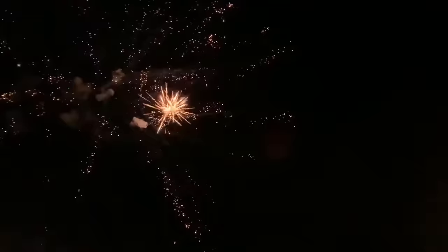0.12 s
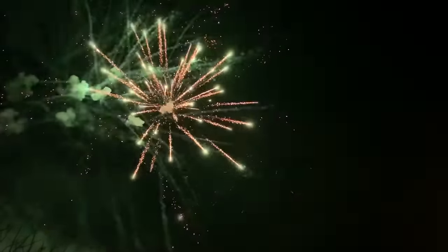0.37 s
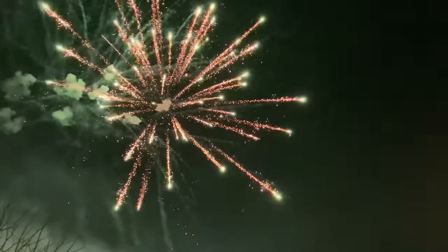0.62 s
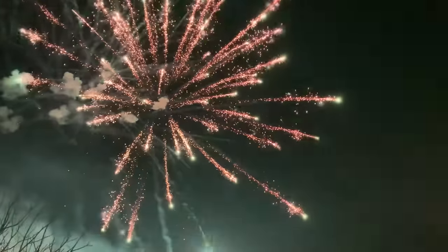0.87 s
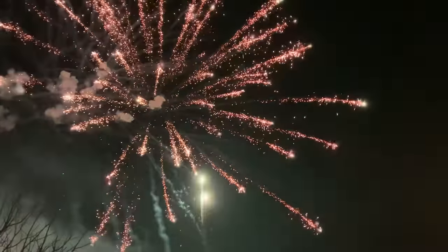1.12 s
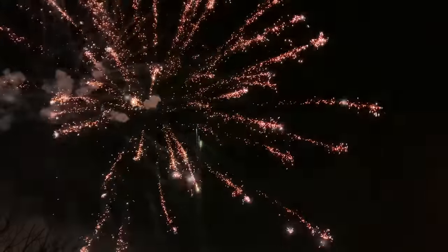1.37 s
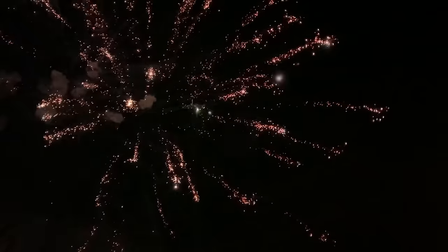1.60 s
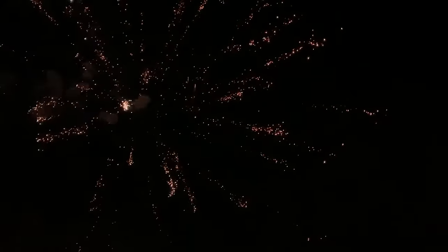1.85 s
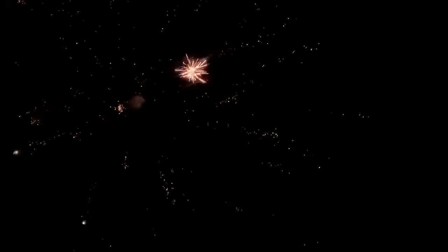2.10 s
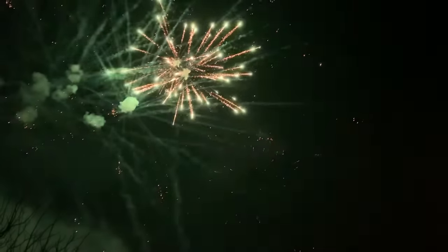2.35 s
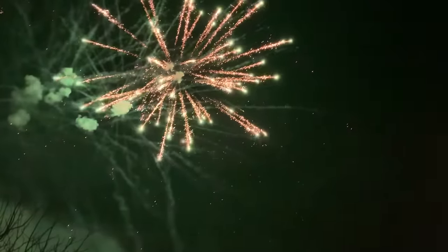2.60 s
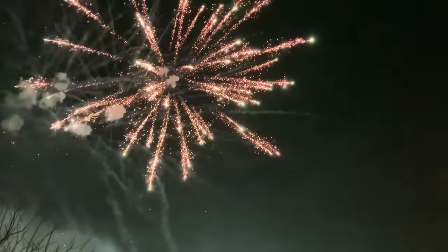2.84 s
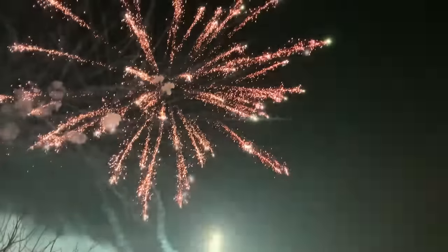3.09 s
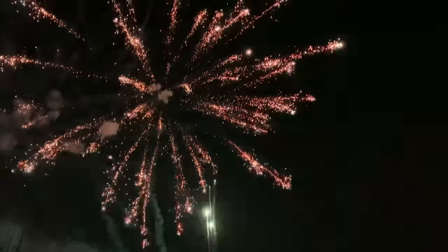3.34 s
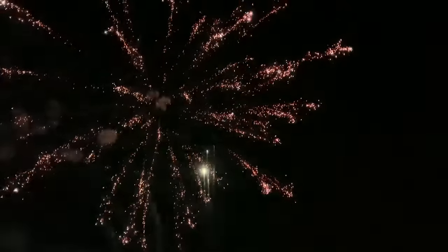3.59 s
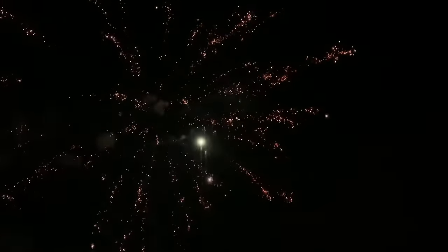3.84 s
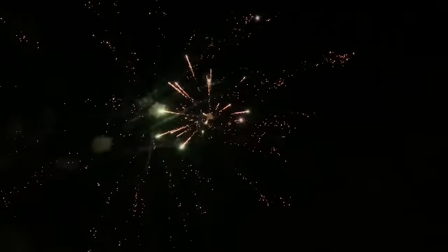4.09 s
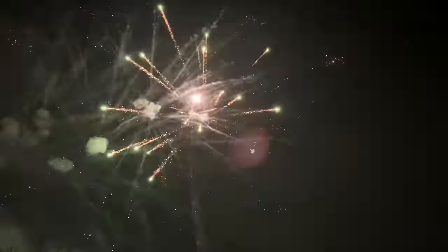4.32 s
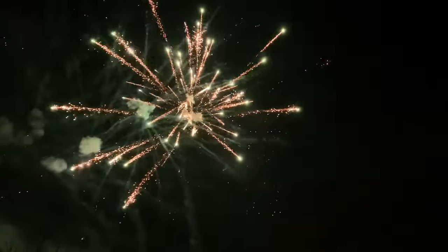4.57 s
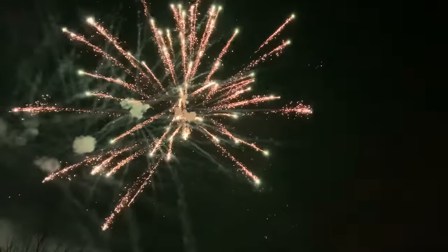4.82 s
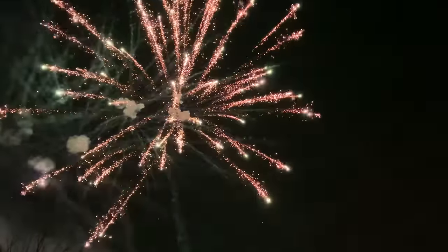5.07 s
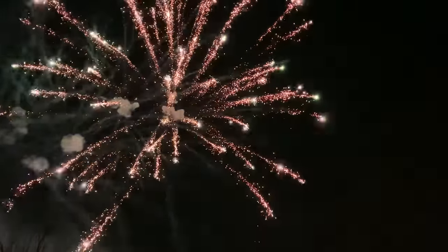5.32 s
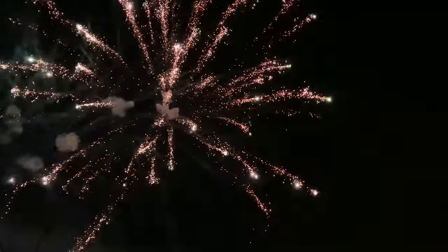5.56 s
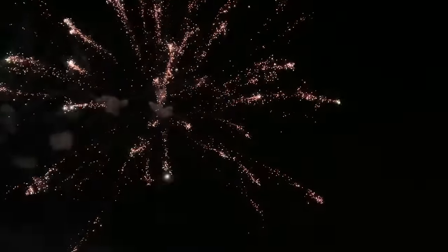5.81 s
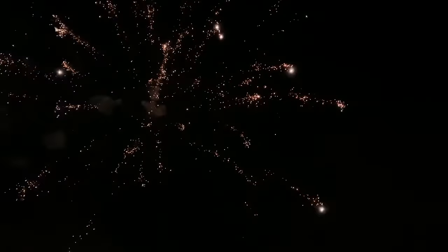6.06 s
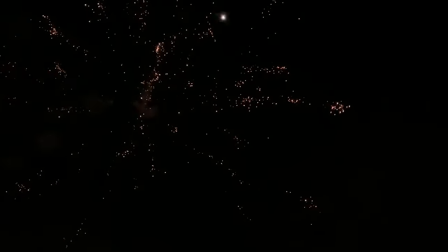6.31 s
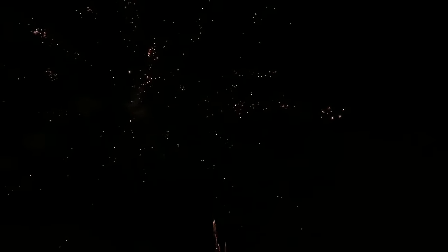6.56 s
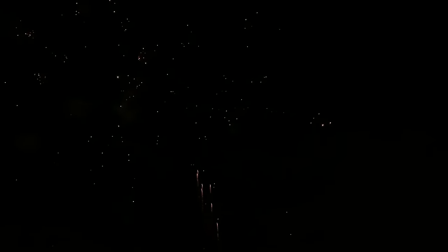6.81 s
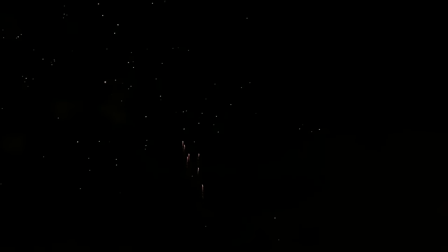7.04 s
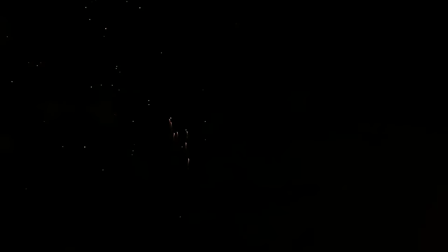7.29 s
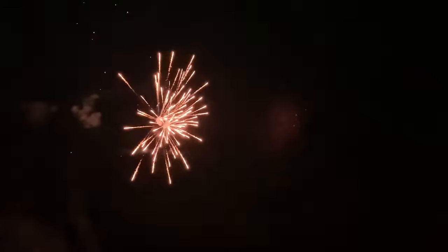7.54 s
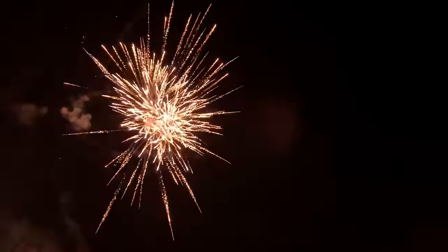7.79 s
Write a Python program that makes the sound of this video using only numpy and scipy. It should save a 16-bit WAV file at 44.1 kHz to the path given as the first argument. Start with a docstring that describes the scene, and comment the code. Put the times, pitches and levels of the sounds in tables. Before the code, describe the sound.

A night street with a low, distant town hum; fading crackle from an earlier firework opens the scene. At about 0.26-0.5 s shells burst overhead in sharp, heavy bangs with quick road slaps and rolling house echoes. Three rapid launch thumps follow at 0.6-0.7 s while fine crackle swells, then thins into separate pops near 2 s. Another burst cluster hits at 2.28-2.4 s, then four launches at 2.75-2.9 s and more sizzling. Bangs return at 4.13 s and 4.45-4.6 s, their crackle lasting longer. Seven quick thuds run from 6.08 to 6.3 s; echoes and scattered pops die away, with faint far-off thuds around 7 s. A soft sputtering fizz rises from 7.15 s, until fresh bangs explode from 7.55 to 7.9 s. The small stereo recorder squashes the peaks.

```python
"""A street at night between houses, with a firework cake heard on a small stereo recorder. Charges lift the
shells from the ground; the shells burst overhead and their stars crackle as crowds of tiny shocks.
Each blast is a short pressure wave that comes back off the road, then rolls away between the houses as
shaped noise. Dull bangs sound streets away, quiet shells fizz on their way up, and the town hums.
The recorder smears every shock into a falling chirp and holds the peaks down."""
import sys
import numpy as np
from scipy import signal
from scipy.fft import rfft, irfft, next_fast_len
from scipy.io import wavfile
from scipy.ndimage import uniform_filter1d, minimum_filter1d

SR = 44100
rng = np.random.default_rng(int(sys.argv[2]) if len(sys.argv) > 2 else 0)


def wav_record(signal):
    """Record a signal, one row per channel, as 16-bit PCM in the file named by sys.argv[1]."""
    frames = np.transpose(np.atleast_2d(signal))
    bounded = np.clip(frames, -1, 1)
    # unit amplitude maps onto the largest positive 16-bit level
    quanta = np.round(bounded * 32767).astype(np.int16)
    wavfile.write(sys.argv[1], SR, quanta)


def level_to_linear(level):
    """Convert decibel levels to linear amplitude factors, elementwise."""
    exponent = np.asarray(level, float) / 20
    return 10 ** exponent


N = 348831  # length in samples

# All levels and spectra are relative, ahead of the recorder.
# The town's distant hum. Each row: frequency in Hz, density in dB per Hz.
TOWN_COLOUR = [(18, -52), (35, -30), (71, -4), (148, -11.5), (178, -6.5), (337, 0.5), (699, -24.5),
               (940, -11), (7000, -55), (9100, -90), (15400, -120)]
TOWN_DB = -44.5
# Groups of crackling shells, the first burst before the start. Each row: burst in seconds, level in dB.
VOLLEYS = [(-1.55, 0), (.3, 0), (2.3, -.5), (4.15, -6), (4.45, -6.5), (4.68, -3)]
# How the stars of every group crackle: faint hiss, delayed flare, slow sag, burn-out, stragglers.
# Each row: seconds after the burst, level in dB.
STAR_LIFE = [(0, -43.5), (.28, -42.5), (.45, -39.5), (.75, -36.5), (1.2, -36.5), (1.55, -39), (1.72, -43),
             (2.05, -45.5), (2.5, -51.5), (3.3, -58)]
# Colour of the crackling stars. Each row: frequency in Hz, density in dB per Hz.
STAR_COLOUR = [(100, -17), (250, 6.5), (500, 2.5), (1200, 4.5), (2000, 5.5), (3500, 4), (6500, -6.5),
               (10500, -19), (14500, -30), (16000, -45)]
PUSH_MS = .03  # time scale of one star's shock
FULL_DB, FULL_PER_S = -35, 5000  # crackle level and pops a second at full flare
# Per dB of fading: the rate of pops and their size drop by so many dB (20 log), the echoes' 10 kHz too
FEWER, SMALLER, DULLER = 3.8, 1.15, 1.0
# The loudest late stars popping. Each row: start in seconds, level in dB.
POPS = [(0.1919, -21), (0.2183, -26), (1.7441, -25), (1.8005, -25), (1.8517, -23), (1.9038, -28),
        (1.912, -23), (1.9438, -29), (2.0227, -30), (2.0631, -27), (2.1103, -33), (2.1409, -26),
        (2.1574, -31), (2.1798, -26), (2.1998, -29), (2.2295, -35), (3.8237, -24), (3.8585, -26),
        (3.8701, -24), (3.902, -25), (3.9144, -28), (3.9728, -22), (4.0536, -29), (4.1046, -33),
        (6.489, -31), (6.5084, -37), (6.556, -34), (6.5903, -29), (6.6054, -36), (6.6404, -47),
        (6.7056, -37), (6.7568, -41), (6.8058, -31), (6.8714, -48), (7.0094, -47), (7.0283, -38),
        (7.3755, -38)]
# Shells bursting overhead; rows below 0 dB are faint forerunners just before a blast. Each row: start in
# seconds, level in dB, lead of the left port in ms, delay of the road's echo in ms.
BURSTS = [(.2586, -7, .25, 8.8), (.2672, 5, .23, 8.9), (.2912, 3, .11, 8.8), (.4815, -13, .1, 9.0),
          (.4838, 5, .09, 9.0), (2.2742, -15, .1, 9.7), (2.2775, -7, .11, 9.7), (2.2872, 5, .11, 10.4),
          (2.2968, 0, .05, 9.6), (2.3881, 4, .09, 9.7), (4.125, -17, .25, 9.4), (4.1345, 6, .25, 9.4),
          (4.4544, 5, .2, 9.4), (4.5565, 5, .09, 9.6), (4.5957, 5, .2, 9.4), (7.5495, -7, .25, 9.4),
          (7.5589, 5, .23, 9.3), (7.6313, 3, .23, 9.3), (7.7766, 5, .18, 9.7), (7.7996, 2.5, .07, 9.2),
          (7.8853, 2, .18, 9.4), (7.8918, 2, .09, 9.1)]
# Lifting charges in the tubes; the row below 0 dB is a faint forerunner just before the next. Each row: start
# in seconds, level in dB, top frequency in Hz.
LIFTS = [(.617, 2, 1800), (.6535, 1.5, 2200), (.6876, .5, 1800), (2.7584, 4.5, 2200), (2.796, 3.5, 2000),
         (2.8351, 3.5, 1800), (2.8739, 3.5, 2200), (6.0811, -12, 1500), (6.0831, 4, 1800),
         (6.1301, 3, 1800), (6.1569, 3, 1800), (6.1918, 2, 2200), (6.2306, 2.5, 2000), (6.2712, 1.5, 2000),
         (6.3097, 1.5, 2000)]
# How the echo of a burst, then of a lift, rolls away. Each row: time in seconds, level in dB.
BURST_ROLL = [(0, 7), (.025, -9), (.06, -12), (.14, -10), (.26, -14), (0.32, -8), (.4, -14), (.6, -18),
              (.8, -21), (1.1, -29), (1.6, -42)]
LIFT_ROLL = [(0, 5), (.03, -6), (.1, -12.5), (.25, -19), (.5, -25), (1.0, -33), (1.601, -62)]
# What the houses return. Each row: frequency in Hz, level in dB.
STREET = [(30, -12), (80, -14), (200, -0.5), (400, -1), (700, -12), (1500, -3.5), (4000, 1.5), (9000, -9)]
# Loss in the air on the longer paths. Each row: frequency in Hz, loss in dB per second.
AIR = [(100, 2.5), (1000, 12), (4000, 36.5), (12000, 55)]
# What the ground and near walls return. Each row: frequency in Hz, density in dB per Hz.
SCATTER = [(150, -20), (400, -3), (1200, 0), (3000, -8), (6500, -18), (11000, -30), (16000, -40)]
# Bangs streets away. Each row: start in seconds, level in dB.
FAR = [(1.771, -23), (4.086, -22), (7.004, -26.5), (7.129, -26)]
# Colour of the shells fizzing on their way up. Each row: frequency in Hz, density in dB per Hz.
FIZZ_COLOUR = [(300, -8), (700, 1.5), (1500, 5), (3000, -5), (3900, -15), (7000, -54), (9000, -85)]
CLIMB_S, ARRIVE_S, ARRIVE_DB, SWELL_DB_PER_S = 7.15, 7.7, -37.5, 22
# Likeness of left and right in diffuse sound. Each row: frequency in Hz, correlation from 0 to 1.
SAME = [(60, 1), (130, 0.93), (290, 0.89), (640, 0.2), (1400, 0.14), (3100, 0.26), (9000, 0.9)]
# Colour of the microphone ports. Each row: centre in Hz, width in Hz (to 1/e^2 of the dB), gain in dB.
PORT = [(4200, 2200, -1.5), (6300, 1500, 2), (10600, 5500, 12), (15300, 2200, 8.5)]
# Bass cut of the microphones. Each row: one channel's corner in Hz, left then right.
BASS_CUT_HZ = [
    [37],
    [44],
]
EDGE_HZ = 16200  # top of the recorder's band
# Crossovers of the band-splitting filters: one list of frequencies in Hz.
CROSSOVERS_HZ = [49, 217, 250, 3760, 5000]
# Treble is shared above the first; channels are opposed at the second; one more half-turn per third
SHARED_HZ, OPPOSED_HZ, HALF_TURN_HZ = 7700, 8600, 2420


def evened(x):
    """Scales to rms 1."""
    return x / np.sqrt(np.mean(x ** 2) + 1e-20)


def wander_db(spread_db, smooth, count=N // 128 + 5):
    """Random level drift with an rms of spread_db, smoothed over so many steps of 128 samples."""
    return spread_db * evened(uniform_filter1d(rng.standard_normal(count), size=smooth))


def read(points, hz):
    """Reads a spectrum on a log frequency axis."""
    f, value = np.transpose(points)
    return np.interp(np.log(hz + 1), np.log(f + 1), value)


def wash(length, db_of):
    """Diffuse stereo noise from random short-time spectra; db_of(hz, s) shapes it."""
    frames = length // 128 + 5
    hz = np.fft.rfftfreq(512, 1 / SR)[:, None]
    a, b, c, d = rng.standard_normal((frames, 257, 4)).T
    same = np.clip(read(SAME, hz), -1, 1)
    left = a + 1j * b
    right = same * left + np.sqrt(1 - same ** 2) * (c + 1j * d)
    spectra = np.array([left, right]) * level_to_linear(db_of(hz, np.arange(frames) * 128 / SR))
    return signal.istft(spectra, nperseg=512, noverlap=384)[1][:, :length]


def shock(push_ms, arrivals, size=4096, order=1):
    """A blast wave (1 - u) exp(-u) heard along arrivals (delay ms, dB, left leads ms, top Hz)."""
    jw = 2j * np.pi * np.fft.rfftfreq(size, 1 / SR) / 1000  # per ms
    wave = SR / 1000 * push_ms ** 2 * jw / (1 + push_ms * jw) ** 2
    side = np.array([[-.5], [.5]])
    paths = 0
    for ms, db, lead, top_hz in arrivals:
        travel = np.exp(-jw * (1 + ms + side * lead))  # after 1 ms of silence
        dulling = (1 + jw * 1000 / (2 * np.pi * top_hz)) ** order
        paths = paths + level_to_linear(db) * travel / dulling
    return irfft(wave * paths, size)


def add(mix, s, sound):
    """Places a sound that starts after 1 ms of silence."""
    part = mix[..., round((s - 1 / 1000) * SR):][..., :sound.shape[-1]]
    part += sound[..., :part.shape[-1]]


def town():
    """A dull distant hum: coloured noise whose level drifts a little."""
    drift_db = wander_db(2.3, 30)
    return level_to_linear(TOWN_DB) * evened(wash(N, lambda hz, t: read(TOWN_COLOUR, hz) + drift_db))


def burning(s):
    """Crackle level in dB: the stars of all groups add in power."""
    age, db = np.transpose(STAR_LIFE)
    power = sum(level_to_linear(size_db + np.interp(s - at, age, db, left=-150)) ** 2 for at, size_db in VOLLEYS)
    return 10 * np.log10(power)


def crackle():
    """Tiny random shocks from ten places in the sky; they thin out and shrink as the stars burn out."""
    steps = np.arange(0, N, 128)
    level_db = np.interp(np.arange(N), steps, burning(steps / SR))
    per_s = FULL_PER_S * level_to_linear(FEWER * (level_db - FULL_DB))
    size = level_to_linear(3.1 * np.minimum(rng.exponential(1, N), 4))  # a few pops stand out
    size *= rng.random(N) < per_s / SR
    size *= level_to_linear(SMALLER * (level_db - FULL_DB))
    place = rng.integers(0, 10, N)
    out = np.zeros((2, N))
    for k, (lead, road) in enumerate(rng.uniform((0, 8.2), (.25, 10.3), (10, 2))):  # both in ms
        pop = shock(PUSH_MS, [(0, 0, lead, 20000), (road, -4.5, .03, 9000)], size=1024)
        out += signal.oaconvolve((size * (place == k))[None], pop, axes=1)[:, :N]
    # the shock's own slope is flattened: the colour comes from the stars' table
    hz = np.fft.rfftfreq(N, 1 / SR)
    flat = np.abs(1 + 2j * np.pi * hz * PUSH_MS / 1000) ** 2 / (hz + 100)
    stars = evened(irfft(rfft(out) * flat * level_to_linear(read(STAR_COLOUR, hz)), N))
    clumps_db = wander_db(1.9, 6)

    def echo_db(hz, t):
        faded_db = FULL_DB - burning(t)
        return read(STAR_COLOUR, hz) + clumps_db - .3 * read(AIR, hz) - DULLER * faded_db * (hz / 10000) ** 3

    blur = evened(wash(N, echo_db))  # echoes off the houses
    return level_to_linear(-37.5) * stars + level_to_linear(level_db - 2.5) * blur


def pops():
    """The loudest late stars, heard one by one as soft-edged shocks with their road echo."""
    out = np.zeros((2, N))
    places = rng.uniform((0, 8.5), (.1, 10), (len(POPS), 2))  # left leads ms, road echo ms
    for (s, db), (lead, road) in zip(POPS, places):
        paths = [(0, 0, lead, 8000), (road, -6, .03, 7000)]
        add(out, s, level_to_linear(db + 21) * shock(.05, paths, size=1024, order=6))
    return out


def scatter(db, fade_db_per_s, floor_db):
    """Dense rustle of small echoes off the ground and near walls: a quick fall onto a slower one."""
    t = np.arange(8192) / SR
    shape = level_to_linear(-fade_db_per_s * t) + level_to_linear(floor_db - 150 * t)
    rustle = evened(wash(8192, lambda hz, s: read(SCATTER, hz) + 0 * s))
    return level_to_linear(db) * np.minimum(t / .0015, 1) * shape * rustle


def roll(blasts, shape):
    """Scattered echoes of the houses: each of three blast tracks rolls away through its own noise tail."""
    s, db = np.transpose(shape)
    out = np.zeros((2, N))
    for blast in blasts:
        lumps_db = wander_db(4, 8, 600)

        def tail_db(hz, t):
            return np.interp(t, s, db) + lumps_db[:len(t)] + read(STREET, hz) - t * read(AIR, hz)

        tail = wash(70000, tail_db)
        tail *= np.minimum(np.arange(70000) / (.004 * SR), 1)
        out += signal.fftconvolve(blast[None], tail / np.linalg.norm(tail[0]), axes=1)[:, :N]
    return out


def bursts():
    """Direct shock with the fireball's slow heave, echoes of road and wall, then scatter and the roll."""
    near, far = np.zeros((2, N)), np.zeros((3, N))
    for k, (s, db, lead, road) in enumerate(BURSTS):
        wall = road + rng.uniform(4.3, 5.5)  # ms
        bright = level_to_linear(.45 * (db - 5))  # weak rows, mostly faint forerunners, have softer fronts
        paths = [(0, -.1, lead, 1100 * bright), (road, -4, .03, 3000 * bright), (wall, -10, .06, 2000 * bright)]
        blast = shock(2.5, paths)
        blast += shock(.06, [(0, -8, lead, 13000 * bright), (road, -20, .03, 7000 * bright)], order=2)
        # the echoes snap in the middle range
        blast += shock(.3, [(road, -3, .03, 3000), (wall, -9, .1, 2500)], order=2)
        for ms, side in rng.uniform((0, -.4), (14, .4), (4, 2)):  # ragged cracks following the road's echo
            blast += shock(.7, [(road + ms, -9, side, 2000)])
        heave = shock(4.4, [(0, -3, lead, 900), (road + 1.83, -3, .2, 350), (road + 16, -12, -.2, 200)])
        heave += shock(11, [(road, -3, 2.5, 45)])
        add(near, s, level_to_linear(db) * (blast + level_to_linear(-7.5) * heave))
        add(near, s + road / 1000, scatter(db - 29, 700, -13))
        # three roll tracks in turn, so neighbouring rows roll differently
        add(far[k % 3], s + .005, level_to_linear(db - 2.5) * shock(1.05, [(0, -.5, lead, 2300)])[0])
    return near + roll(far, BURST_ROLL)


def lifts():
    """Shorter shocks from ground level; the road's echo follows in about 1 ms, then the nearest walls."""
    near, far = np.zeros((2, N)), np.zeros((3, N))
    for k, (s, db, top_hz) in enumerate(LIFTS):
        push, skim, *walls = rng.uniform((.6, .6, 1.2, 2, 3.5), (.85, 1.1, 2.2, 3.5, 6))  # ms
        paths = [(0, 0, -.024, top_hz), (skim, -5, .09, 2200)]
        paths += [(ms, -12, (-1) ** k * .2, 2500) for ms in walls]
        add(near, s, level_to_linear(db + 2.5) * shock(push, paths))
        add(near, s + .0015, scatter(db - 31, 1200, -11))
        add(far[k % 3], s, level_to_linear(db - 7) * shock(push, paths[:1])[0])
    return near + roll(far, LIFT_ROLL)


def far_bangs():
    """Dull thuds from streets away: steeply dulled shocks with one echo."""
    out = np.zeros((2, N))
    for s, db in FAR:
        add(out, s, level_to_linear(db + 11) * shock(.8, [(0, 0, .1, 750), (3, -8, -.1, 600)], order=3))
    return out


def climb():
    """Quiet shells on their way up: a dull, sputtering fizz of noise that swells, then stops."""
    t = np.arange(N) / SR
    sputter_db = wander_db(3.2, 10)
    fizz = evened(wash(N, lambda hz, t: read(FIZZ_COLOUR, hz) + sputter_db))
    swell = level_to_linear(ARRIVE_DB + SWELL_DB_PER_S * np.minimum(t - ARRIVE_S, 0))
    return swell * (t > CLIMB_S) * (t < ARRIVE_S) * fizz


def scene():
    """All sources at the microphone ports."""
    return town() + crackle() + pops() + bursts() + lifts() + far_bangs() + climb()


def share_treble(ports, hz):
    """In the top octave both channels carry the left port, turned against each other more and more."""
    shared = 1 / (1 + np.exp(np.clip((SHARED_HZ - hz) / 250, -50, 50)))
    turn = np.pi * (1 + (hz - OPPOSED_HZ) / HALF_TURN_HZ) * np.array([[-.5], [.5]])
    return np.sqrt(1 - shared) * ports + np.sqrt(shared) * ports[0] * np.exp(1j * turn)


def recorder_response(hz):
    """Bass cut, band edge, port resonances and the phase turns of the band-splitting filters."""
    u = 1j * hz / BASS_CUT_HZ
    colour = u ** 2 / (1 + np.sqrt(2) * u + u ** 2) / (1 + (hz / EDGE_HZ) ** 40)
    colour *= level_to_linear(sum(db * np.exp(-((hz - f) / width) ** 2 * 2) for f, width, db in PORT))
    for f in CROSSOVERS_HZ:  # each delays what lies under it: treble first, bass last
        u = 1j * hz / f
        colour *= (1 - np.sqrt(2) * u + u ** 2) / (1 + np.sqrt(2) * u + u ** 2)
    return colour


def limit(x):
    """Holds peaks near -0.6 dB of full scale, both channels alike, with a smoothed gain."""
    over_db = np.maximum(20 * np.log10(abs(x).max(0) + 1e-9) + .6, 0)
    fall = np.arange(N) * 400 / SR  # recovers 400 dB a second
    held_db = -minimum_filter1d(fall - np.maximum.accumulate(over_db + fall), 45)
    return x / level_to_linear(uniform_filter1d(held_db, 45))


def top_cut(x):
    """Nothing passes above the cut-off."""
    return signal.sosfilt(signal.butter(12, 16990, fs=SR, output="sos"), x)


def record(dry):
    """The small stereo recorder: shared treble, microphone and filter response, then the peak limiter."""
    size = next_fast_len(N + SR)
    hz = np.fft.rfftfreq(size, 1 / SR)
    ports = share_treble(rfft(dry, size), hz)
    heard = irfft(ports * recorder_response(hz), size)[:, :N]
    return top_cut(limit(heard))


dry = scene()
out = record(dry)
wav_record(out)
```